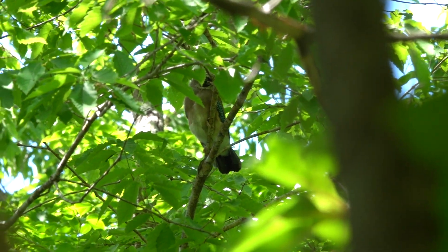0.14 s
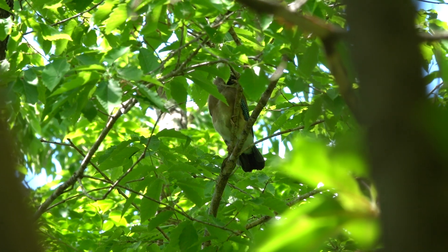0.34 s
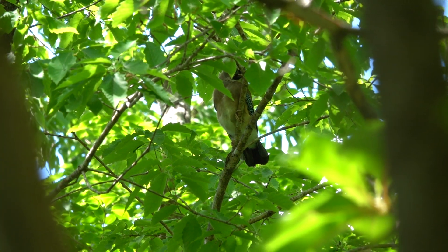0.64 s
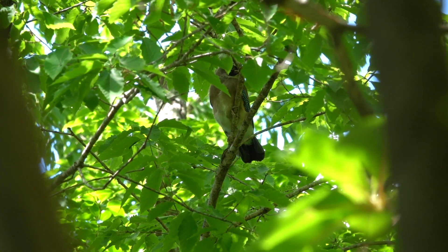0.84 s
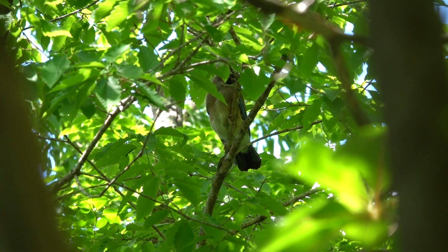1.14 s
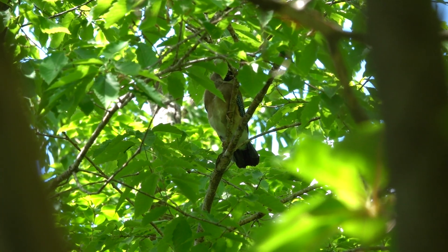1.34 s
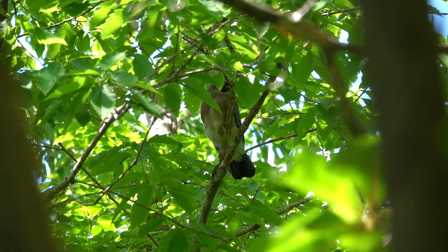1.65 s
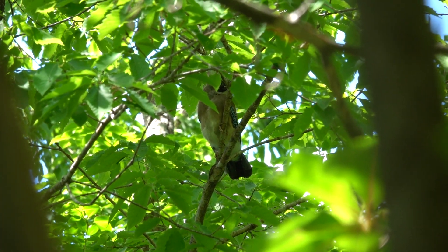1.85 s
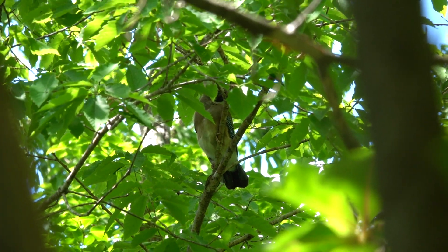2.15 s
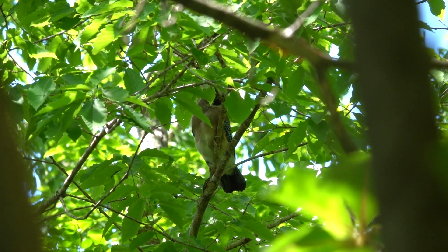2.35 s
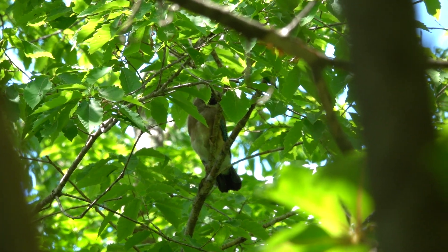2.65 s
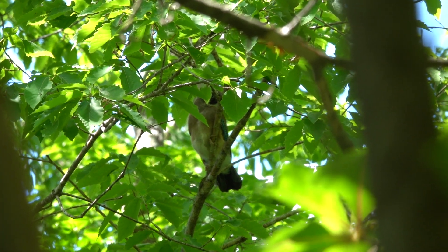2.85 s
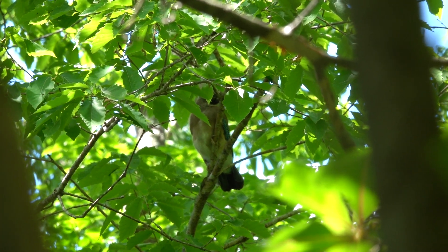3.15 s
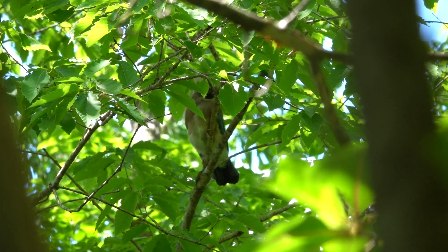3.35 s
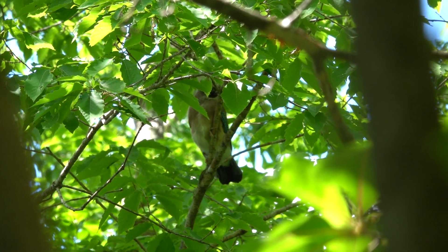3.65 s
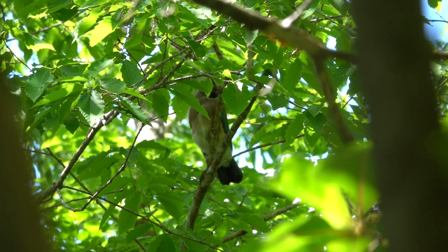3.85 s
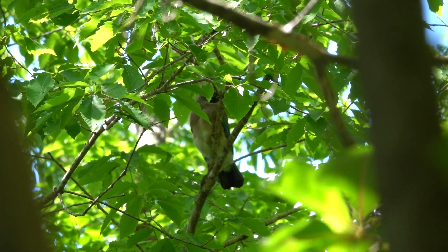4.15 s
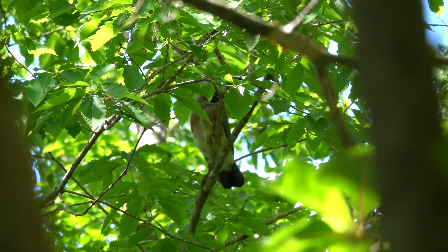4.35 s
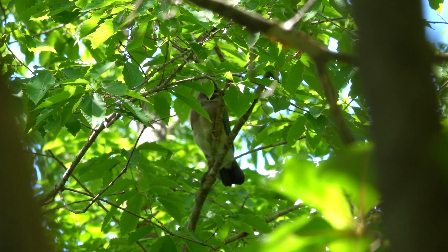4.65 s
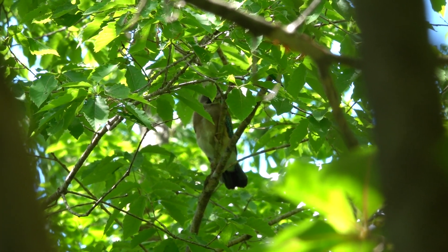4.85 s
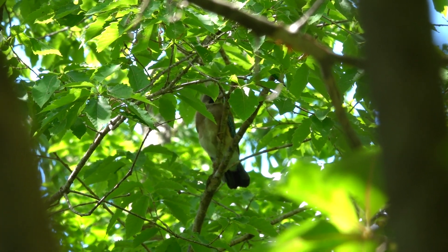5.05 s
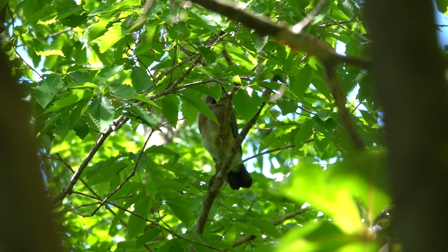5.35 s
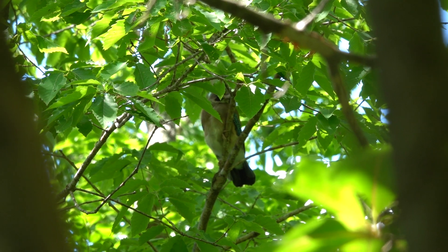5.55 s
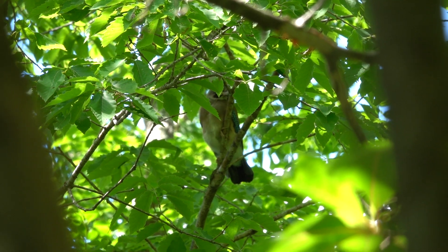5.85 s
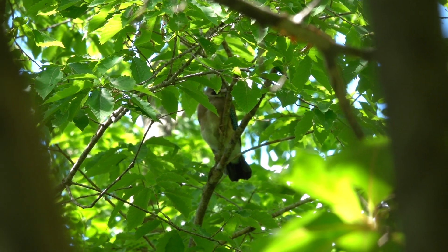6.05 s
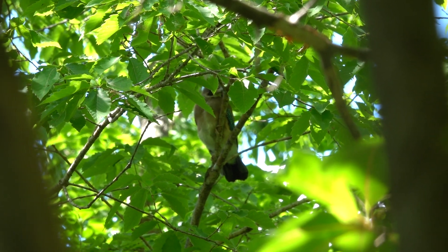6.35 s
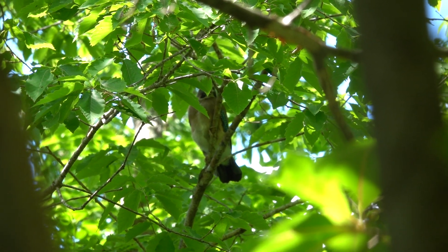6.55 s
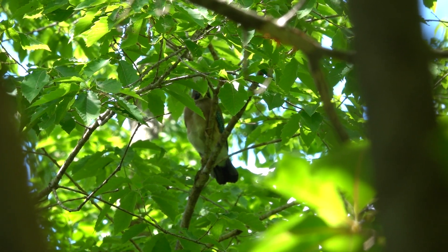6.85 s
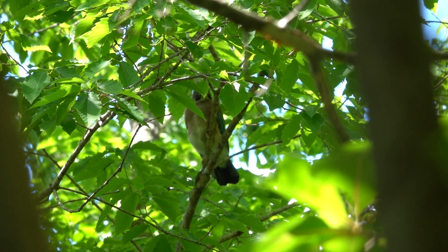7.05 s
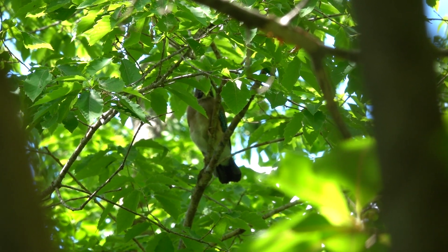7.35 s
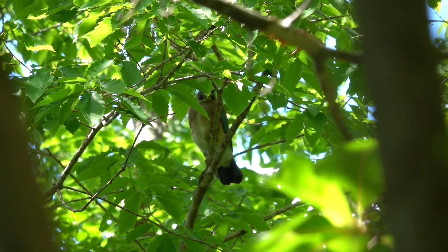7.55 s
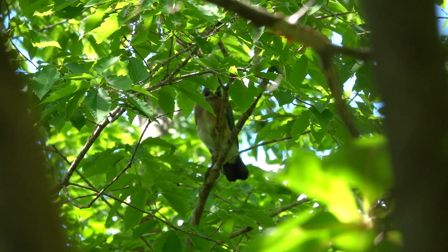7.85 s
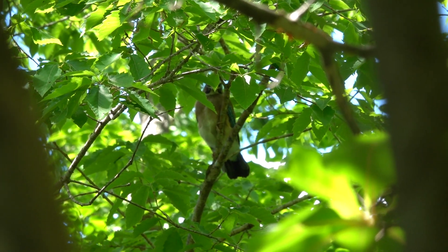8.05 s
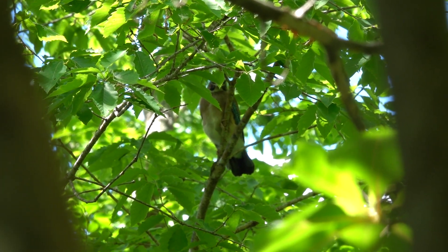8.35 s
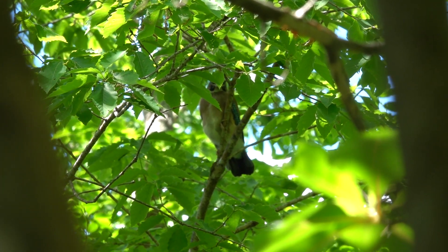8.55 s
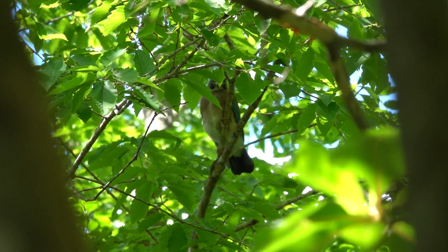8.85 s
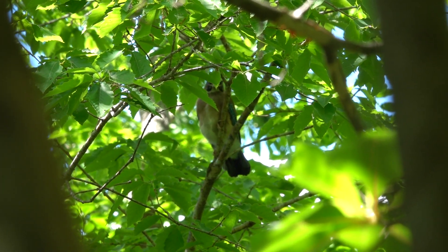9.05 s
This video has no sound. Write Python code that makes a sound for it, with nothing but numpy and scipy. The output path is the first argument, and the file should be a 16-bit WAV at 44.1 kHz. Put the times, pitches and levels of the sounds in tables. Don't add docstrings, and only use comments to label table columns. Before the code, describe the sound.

Cicadas drone in a dense, shrill, pulsing buzz among summer trees, loud at first then receding, with thin whistled tones and faint buzzy bird notes.

```python
import sys
import numpy as np
from scipy import signal
from scipy.fft import rfft, irfft, next_fast_len
from scipy.io import wavfile
from scipy.ndimage import uniform_filter1d

SR = 44100
rng = np.random.default_rng(int(sys.argv[2]) if len(sys.argv) > 2 else 0)


def transcribe(u):
    v = np.clip(np.atleast_2d(u).T, -1, 1)
    q = np.round(v * 32767).astype(np.int16)
    wavfile.write(sys.argv[1], SR, q)


def elevation(decibels):
    levels = np.asarray(decibels, float)
    return 10 ** (levels / 20)


N = 406161
T = np.arange(N) / SR
SIZE = next_fast_len(N)
HZ = np.maximum(np.arange(SIZE // 2 + 1) * SR / SIZE, 1)
LOG_HZ = np.log(HZ)

# click_rate_hz, spread_between_singers [0-1], pitch_flutter [0-1], left_minus_right_db
CLUSTERS = [
    (1420, .007, .009, 0.5),
    (1472, .004, .0068, -1.0),
    (1530, .012, .012, -1.0),
    (1597, .011, .011, -1.0),
]
CLUSTER_LEVELS = [-34, -32, -35.5, -40.5]
# peak_s, length_s, swell_db
CLUSTER_SWELLS = [
    [(.3, 6.6, 3), (1.75, 2.4, 1), (2.7, 1.3, -1), (3.95, 0.48, -7), (5.3, 1.36, 2), (8.4, 4.8, 5.5)],
    [(1.15, 1.4, 1.5), (2.8, 2.7, 3.5), (3.95, 1.65, 6), (5.25, 0.85, 0), (6.3, 1.75, 2), (8.6, 1.27, -1)],
    [(.05, .9, -0.5), (2.55, 0.73, 5), (4.8, 1.7, 4), (7.1, 3.1, 6.5), (8.75, .8, 0), (9.2, 0.72, -12)],
    [(2.4, 2.2, 5.5), (6.75, .8, 2), (7.4, 1.12, -6)],
]
# pitch_hz, level_db
BELLY = [(1100, -25), (1450, -32), (2400, -30.5), (2680, -2.5), (2830, -3), (3260, 1.5), (3450, -12.5),
         (3800, -27.5), (4450, -22.5), (5100, -32)]
# pitch_hz, level_db
OVERTONES = [(4600, -6), (5200, 5.5), (5700, 1), (6300, 3), (6750, -3), (7200, -3.5), (7800, 1),
             (8350, -9.5), (9000, -1.5), (9700, -3.5), (10500, -0.5), (11200, -2), (11900, -3),
             (15700, -18)]


def clusters():
    flicker_db = 0.94 * walk(8.8)
    arrival_db = 3.6 * ramp(6.9, 1.6)
    middle_db = follow(-45.5, 0.96) + flicker_db
    top_db = follow(-50, 1.13) + flicker_db + arrival_db
    deepest_stretch = (2.56, 1.3, 2.3)  # peak_s, length_s, extra_db
    throb_db = -(0.56 + swells([deepest_stretch])) * throb()
    shift_s = 0.74
    lean_db = 2.7 - 2.3 * ramp(1.6, shift_s) - 2.0 * ramp(4.28, shift_s)

    bellies, clicks = 0, 0
    near_db, belly = follow(0.1, 0.46), shape(BELLY)
    for cluster, steady_db, rows in zip(CLUSTERS, CLUSTER_LEVELS, CLUSTER_SWELLS):
        click_rate_hz, spread, flutter, pan_db = cluster
        db = steady_db + near_db + swells(rows)
        train = level(ribs(click_rate_hz, spread, flutter, 7.35, count=3), 0)
        scrape = rng.standard_normal(N)
        ringing = level(colour(train + elevation(-0.5) * scrape, belly), 0)
        bellies = bellies + pan(ringing * elevation(db + 0.5 * throb_db), pan_db + lean_db)
        clicks = clicks + elevation(0.54 * db) * train

    steady_clicks = clicks / np.sqrt(uniform_filter1d(clicks ** 2, SR // 2))
    grit = rng.standard_normal(N) + .9 * rng.standard_normal((2, N))
    rasp = rfft(steady_clicks + elevation(-8) * grit, SIZE)
    rasp = rasp * shape(OVERTONES) * elevation(1.1 * HZ / 1500)
    top = 1 / (1 + (8350 / HZ) ** 24)
    middle = level(irfft(rasp * (1 - top), SIZE)[:, :N], 0) * elevation(middle_db + throb_db)
    highest = level(irfft(rasp * top, SIZE)[:, :N], 0) * elevation(top_db + 0.93 * throb_db)
    return bellies + pan(middle, 0.78) + pan(highest, 1.45)


def ribs(hz, spread, flutter, wide_db, count):
    out = np.zeros((2, N))
    for place in np.linspace(-1, 1, count):
        rate = hz * (1 + spread * (place + .8 * walk(1.6)) + flutter * walk(220))
        phase = 2 * np.pi * np.cumsum(rate) / SR
        clicks = 1 / (1.64 - 1.6 * np.cos(phase))
        out += pan(clicks - clicks.mean(), wide_db * np.cos(4 * place))
    return out


def throb():
    rate_hz, first_dip_s = 8.415, -.035
    return np.cos(2 * np.pi * rate_hz * (T - first_dip_s))


# time_s, nearness_db
NEARNESS = [(0, -2), (1.05, 0), (1.75, 3), (2.12, -1), (3.15, 1), (3.6, -1.5), (4.2, -1.5), (4.6, -2.5),
            (4.8, -5), (5.5, -9.5), (6.9, -13), (7.4, -14), (8.4, -12), (9.21, -10)]


def follow(near_level_db, db_per_db):
    s, db = np.transpose(NEARNESS)
    return near_level_db + db_per_db * np.interp(T, s, db)


def soloist():
    start_s, stop_s, click_rate_hz = 3.26, 4.4, 1456
    rate = click_rate_hz * (1 + .003 * walk(2.5) + 0.0038 * walk(90))
    phase = 2 * np.pi * np.cumsum(rate) / SR
    strand = elevation(-32) * np.sin(2 * phase) + elevation(-59) * np.sin(3 * phase)
    size = ramp(start_s, 0.25) * (1 - ramp(stop_s - .12, 0.1)) * elevation(-throb())
    return pan(size * elevation(1.9 * walk(30)) * strand, -.4) * elevation(3.2)


# start_s, length_s, pitch_hz, level_db, sag_hz
PHRASES = [(0, .2, 2150, -38, 13.3), (0.065, 0.43, 2220, -34, 31), (0.297, 0.47, 2120, -39, 27),
           (0.878, 0.1, 2150, -31.5, 5), (1.04, 0.29, 2210, -39, 15), (1.511, 0.57, 2202, -32, 30.8),
           (2.127, 0.32, 2154, -44.5, 20), (2.42, 0.27, 2160, -38, 29), (3.367, 0.34, 2220, -43, 5),
           (4.243, .29, 2115, -50, 12.5), (4.472, .53, 2256, -42, 9.4), (5.084, .34, 2224, -42.5, 5.1),
           (5.362, .6, 2257, -40.5, 70), (6.05, 0.59, 2073, -45, 80), (6.68, 0.52, 2176, -44.5, 8.7),
           (7.3, 1, 2176, -41.5, 33), (8.077, 0.4, 2060, -41.5, 90), (8.827, 0.23, 2247, -41, 5),
           (8.94, 1, 2186, -36, 24)]


def whistlers():
    attack_s, release_s, rise_hz, spread = .07, 0.12, 35.2, .012
    near = 0
    for turn in (PHRASES[0::2], PHRASES[1::2]):
        hz, size = np.full(N, 2180.), np.zeros(N)
        for s, length, pitch_hz, db, sag_hz in turn:
            note = slice(int(s * SR), int((s + length) * SR))
            age = T[note] - s
            rise = rise_hz * np.exp(-np.abs(age) / attack_s)
            hz[note] = pitch_hz - rise - sag_hz * (age / length) ** 3
            size[note] = elevation(db) * np.clip(np.minimum(age / attack_s, (length - age) / release_s), 0, 1)
        pair = sum(tone(hz * (1 + spread * place), 0.014, 2.3 * place) for place in (-1, 1))
        near = near + level(pair, 0) * size * elevation(-0.5 * walk(25))
    far = 0
    for far_hz, pan_db in ((2050, 38), (2130, -14), (2220, -36.0)):
        waver = elevation(2.0 * walk(2.31))
        far = far + waver * tone(far_hz * (1 + .015 * walk(2.2)), 0.019, pan_db)
    return pan(near + level(far, -43.0), -0.47)


# start_s, length_s, pitch_hz, level_db
BIRD_NOTES = [(0.502, 0.0477, 4160, -44), (.563, .086, 4040, -41), (0.778, 0.096, 4172, -44),
              (1.33, 0.11, 4130, -48), (2.062, 0.11, 4220, -38), (2.82, 0.086, 4430, -47),
              (5.724, .15, 4010, -50), (5.881, .18, 4170, -52), (6.05, .1, 4000, -60),
              (6.922, .12, 4170, -56), (7.272, 0.093, 4060, -56), (7.553, 0.1, 4282, -56),
              (7.942, .085, 4230, -52), (8.05, .14, 4150, -51), (8.25, 0.19, 4220, -53.5),
              (8.55, 0.13, 4010, -51)]


def bird():
    buzz_hz, glide_hz_per_s, tremor_hz = 158.5, -1300, 262
    tremor = 2 * np.pi * np.cumsum(buzz_hz * (1 + .09 * walk(70))) / SR
    shake = np.sin(tremor) + .25 * walk(400)
    pitch, size = np.zeros(N), np.zeros(N)
    for s, length, hz, db in BIRD_NOTES:
        note = slice(int(s * SR), int((s + 1.3 * length) * SR))
        place = np.abs(T[note] - s) / (1.3 * length)
        swell = np.abs(np.sin(np.pi * place ** 0.83))
        glide = glide_hz_per_s * length * (place - .5)
        pitch[note] = hz + glide + tremor_hz * (0.39 + 0.87 * swell) * shake[note]
        size[note] = elevation(db + 6.0) * swell ** 1.4
    voice = np.sin(2 * np.pi * np.cumsum(pitch) / SR)
    return pan(size * (1 + 0.15 * np.cos(tremor)) * voice, -1.4)


# pitch_hz, level_db
CROWD_BELLY = [(1000, -41), (1250, -3), (1450, -3), (1800, -6.5), (2500, 6), (3000, 2.5), (3600, -3.5),
               (4400, -8.5), (5200, -33)]
# peak_s, length_s, swell_db
CROWD_SWELLS = [
    (8.3, 0.78, 4),
    (9.2, .8, 3.5),
]


def crowd():
    blur = level(ribs(1520, .08, .055, 3.0, count=4), 0)
    blur = blur + elevation(-2.0) * (rng.standard_normal(N) + 1.1 * rng.standard_normal((2, N)))
    drone = level(colour(blur, shape(CROWD_BELLY)), 0)
    return pan(drone * elevation(follow(-38, 0.31) + swells(CROWD_SWELLS)), -0.59)


def leaves(x, wet_db, t60):
    lag = T[:SR // 2]
    cloud = rng.standard_normal((2, len(lag))) * elevation(-60 * lag / t60)
    cloud = cloud * elevation(wet_db) / np.sqrt(np.sum(cloud ** 2, axis=1, keepdims=True))
    cloud = rfft(cloud, SIZE) * rfft(x.mean(axis=0), SIZE)
    sway = 2 * np.pi * np.array([walk(1.5), walk(1.5)])
    upright = irfft(cloud, SIZE)[:, :N]
    turned = irfft(1j * cloud, SIZE)[:, :N]
    echoes = upright * np.cos(sway) + turned * np.sin(sway)
    return (x + echoes) / np.sqrt(1 + elevation(2 * wet_db))


# pitch_hz, level_db (per Hz)
AIR = [(25, -12), (40, -12), (60, -4.5), (100, -7.5), (200, -3.5), (400, -2), (1000, -5), (1900, 3.5),
       (3700, -5), (5200, -16.5), (8300, -20), (12000, -21), (15700, -38)]
# pitch_hz, side_minus_mid_db
AIR_WIDTH = [(60, -18), (110, -18), (200, -13), (380, -14), (700, -6), (1290, -5), (2380, -22), (4400, 6.5),
             (8120, 1), (15000, -15)]
# pitch_hz, width_hz, level_db
HUMS = [
    (49.4, 20, -70.5),
    (135, 3.5, -67.5),
    (886, 170, -63.5),
]
# start_s, length_s, pitch_hz, width_hz, level_db
THUDS = [
    (3.48, 0.3, 400, 300, -59),
    (5.9, 0.15, 308, 242, -58),
    (8.216, 0.38, 342.6, 150, -54.5),
]
# start_s, length_s, pitch_hz, width_hz, level_db
TWIG = (3.871, 0.013, 800, 1300, -41.5)


def air():
    mid, side, grit = rng.standard_normal((3, N))
    bed = level(colour(mid, shape(AIR)), -47)
    wide = level(colour(side, shape(AIR)), -47)
    for hz, width_hz, db in HUMS:
        bed = bed + level(colour(grit, ring(hz, width_hz)), db)
    for s, length, hz, width_hz, db in THUDS + [TWIG]:
        bed = bed + bump(s, length) * level(colour(grit, ring(hz, width_hz)), db)
    side_hz, side_db = np.transpose(AIR_WIDTH)
    wide = colour(wide, elevation(np.interp(LOG_HZ, np.log(side_hz), side_db)))
    return pan(np.array([bed + wide, bed - wide]), 0.63)


def level(x, db):
    return x * elevation(db) / np.sqrt(np.mean(x ** 2))


def shape(table):
    hz, db = np.transpose(table)
    return elevation(np.interp(LOG_HZ, np.log(hz), db, -120, -120))


def colour(x, gain):
    return irfft(rfft(x, SIZE) * gain, SIZE)[..., :N]


def ring(hz, width_hz):
    return 1 / (1 + (2 * (HZ - hz) / width_hz) ** 2)


def walk(rate):
    hop = 8
    k = int(SR / rate / hop)
    held = np.repeat(rng.standard_normal(N // hop // k + 2), k)
    coarse = uniform_filter1d(uniform_filter1d(held, k), k)
    return 1.3 * uniform_filter1d(np.repeat(coarse[:N // hop + 1], hop), hop)[:N]


def bump(start, length):
    out = np.zeros(N)
    span = slice(max(int(start * SR), 0), max(int((start + length) * SR), 0))
    out[span] = np.sin(np.pi * (T[span] - start) / length) ** 2
    return out


def ramp(start, length):
    return np.sin(np.pi / 2 * np.clip((T - start) / length, 0, 1)) ** 2


def swells(rows):
    return sum(db * bump(s - length / 2, length) for s, length, db in rows)


def pan(x, pan_db):
    lean = elevation(pan_db / 2)
    return x * np.array([lean, 1 / lean]).reshape(2, -1)


def tone(hz, flutter, pan_db):
    return pan(np.sin(2 * np.pi * np.cumsum(hz * (1 + flutter * walk(70))) / SR), pan_db)


def scene():
    trees = clusters() + soloist() + whistlers() + bird() + crowd()
    return leaves(trees, -3.5, .5) + air()


def low_pass(x):
    return signal.sosfilt(signal.butter(12, 15640, fs=SR, output="sos"), x)


def record(dry):
    return low_pass(dry)


dry = scene()
out = record(dry)
transcribe(out)
```